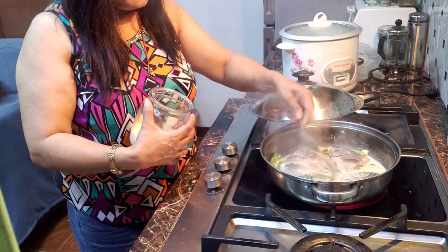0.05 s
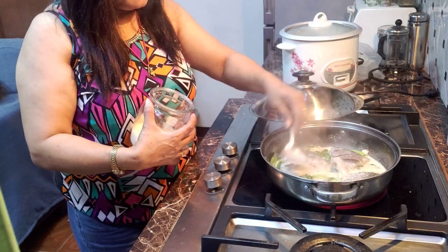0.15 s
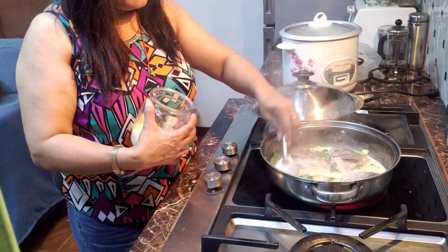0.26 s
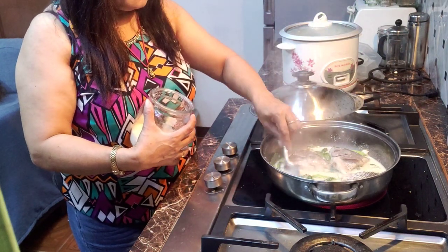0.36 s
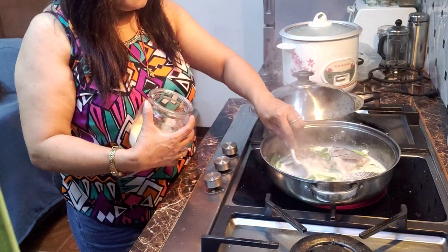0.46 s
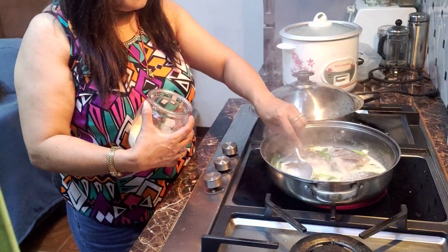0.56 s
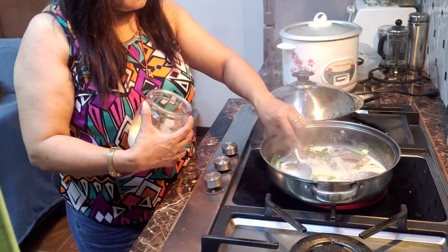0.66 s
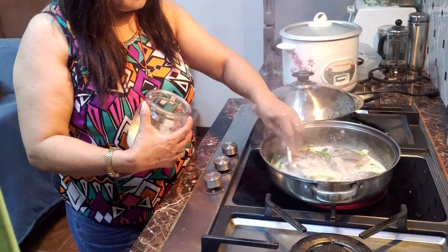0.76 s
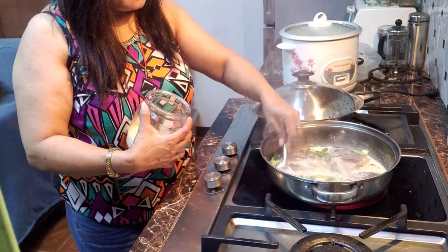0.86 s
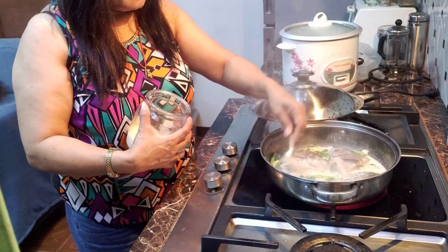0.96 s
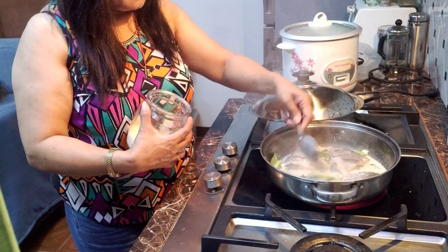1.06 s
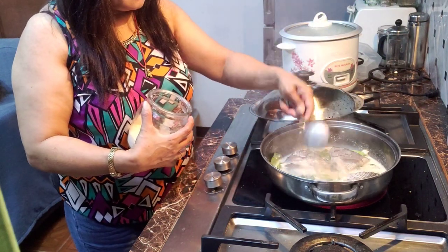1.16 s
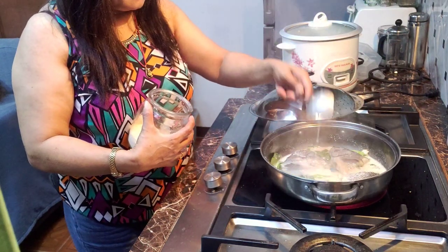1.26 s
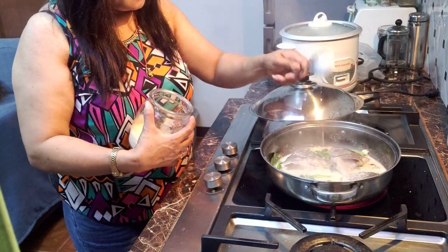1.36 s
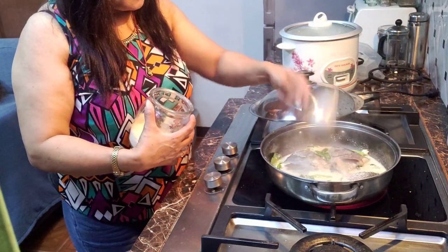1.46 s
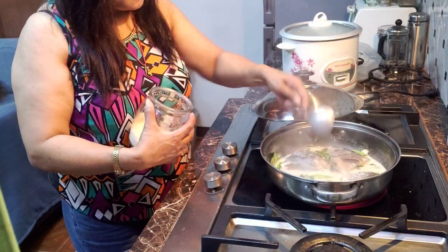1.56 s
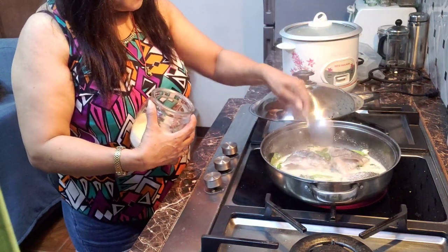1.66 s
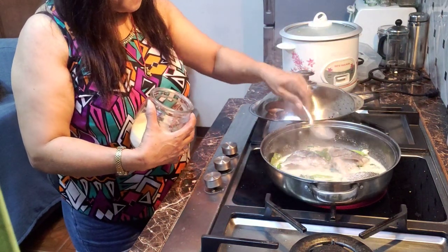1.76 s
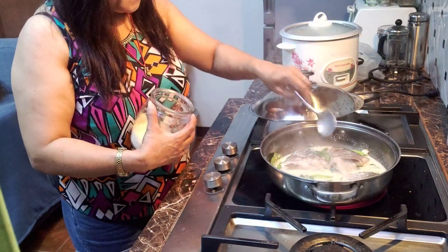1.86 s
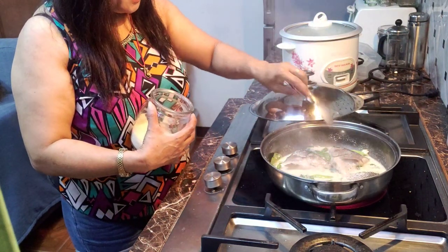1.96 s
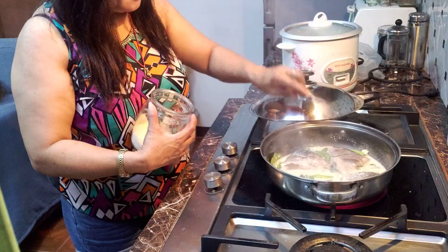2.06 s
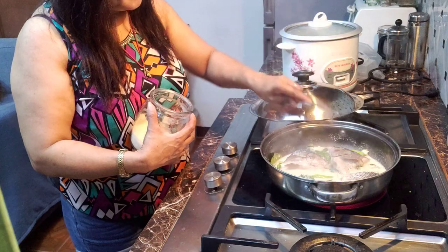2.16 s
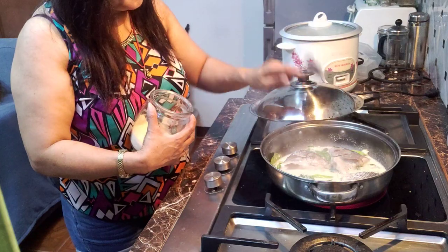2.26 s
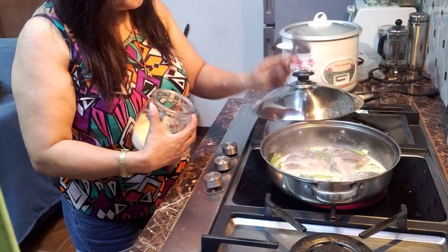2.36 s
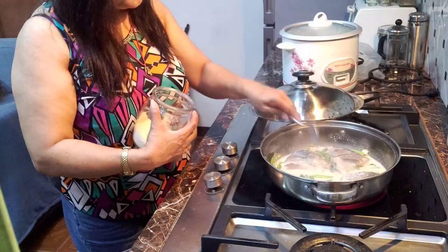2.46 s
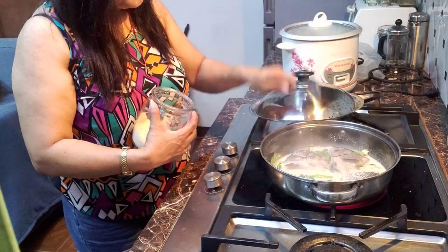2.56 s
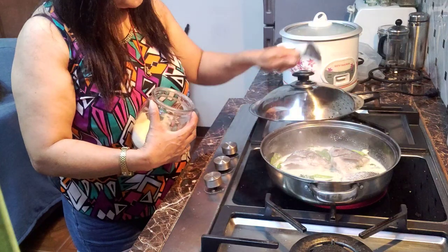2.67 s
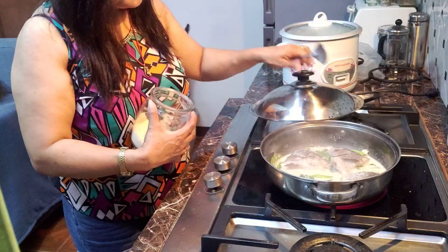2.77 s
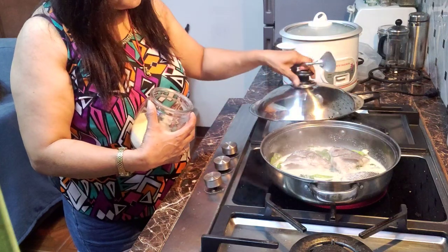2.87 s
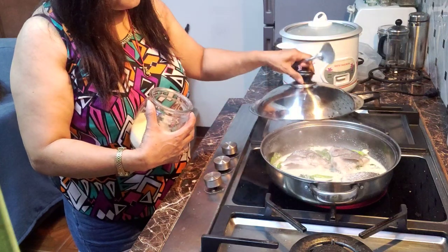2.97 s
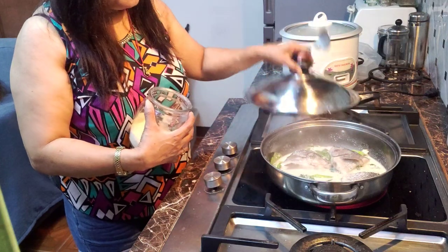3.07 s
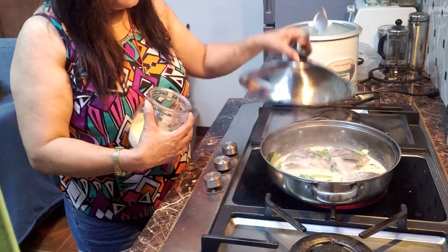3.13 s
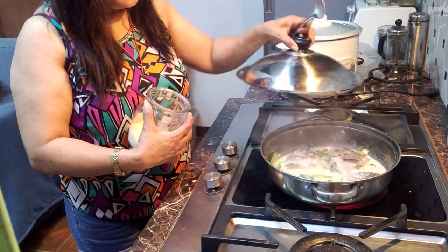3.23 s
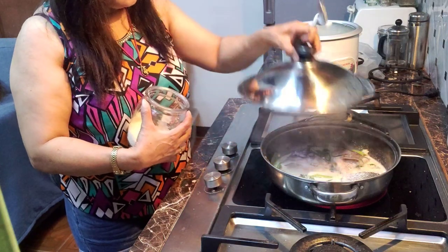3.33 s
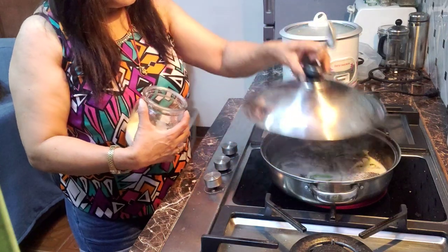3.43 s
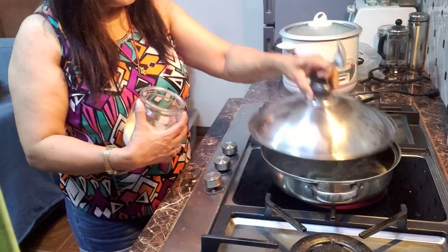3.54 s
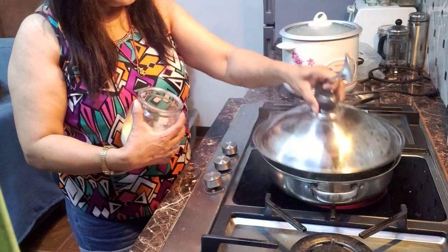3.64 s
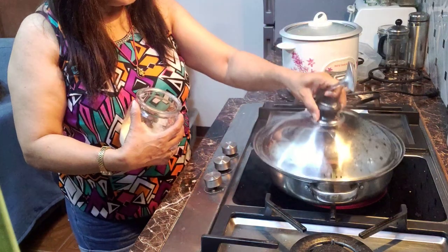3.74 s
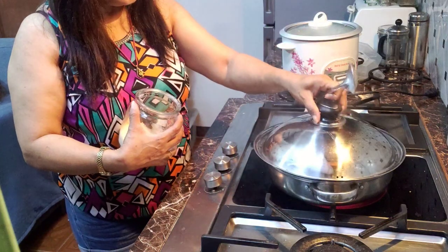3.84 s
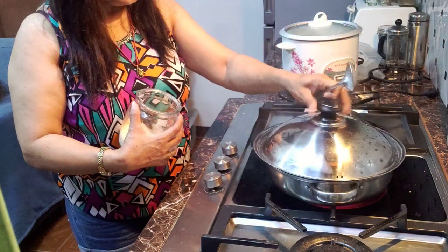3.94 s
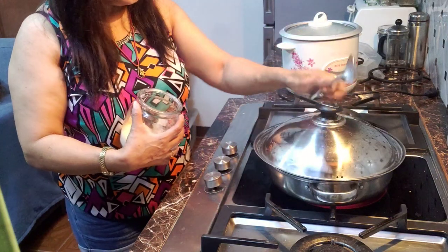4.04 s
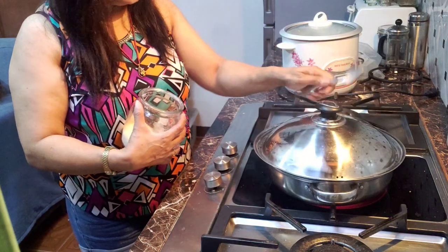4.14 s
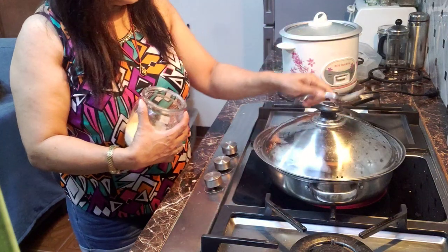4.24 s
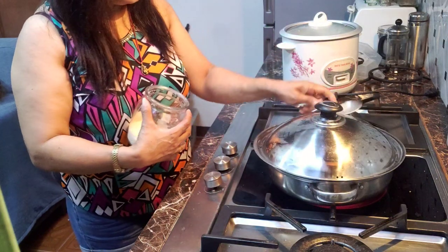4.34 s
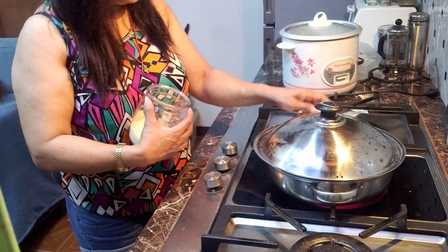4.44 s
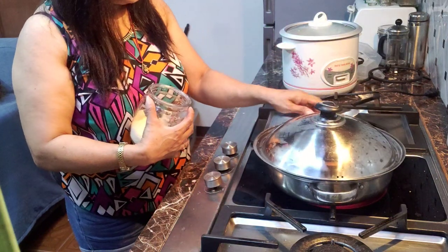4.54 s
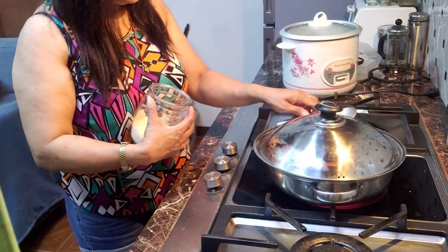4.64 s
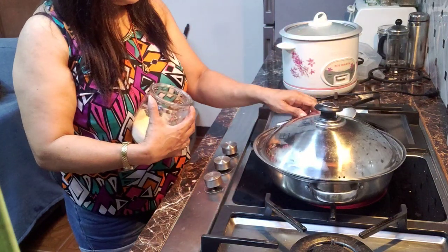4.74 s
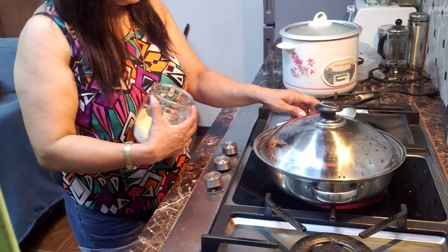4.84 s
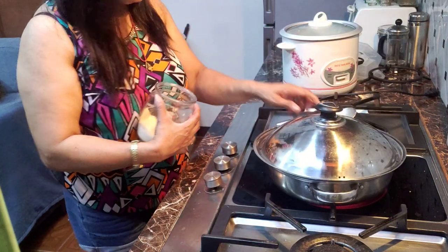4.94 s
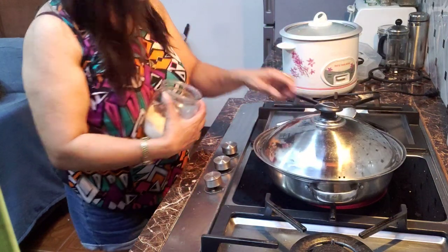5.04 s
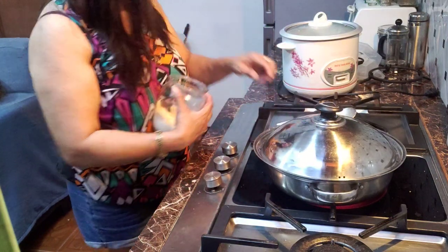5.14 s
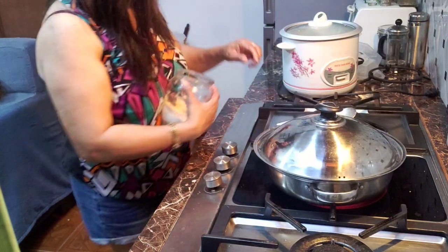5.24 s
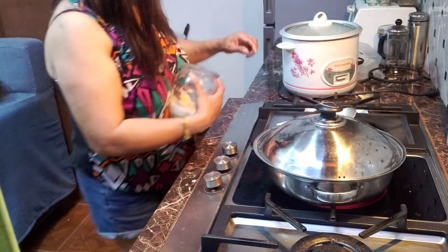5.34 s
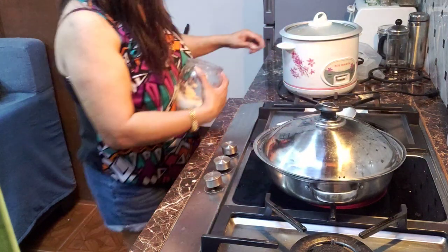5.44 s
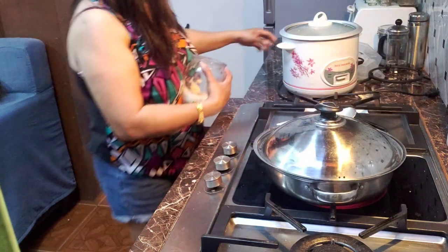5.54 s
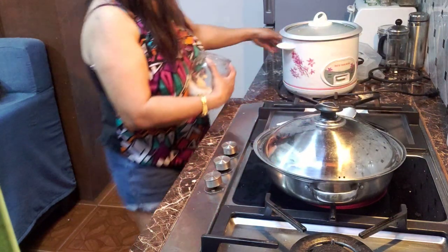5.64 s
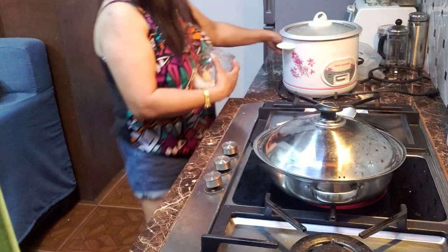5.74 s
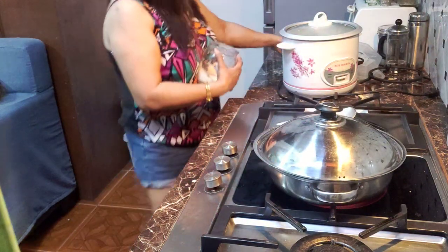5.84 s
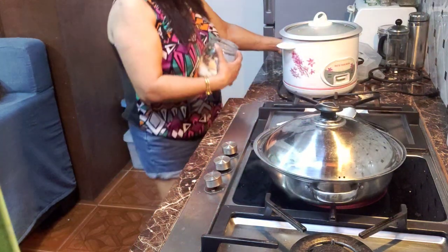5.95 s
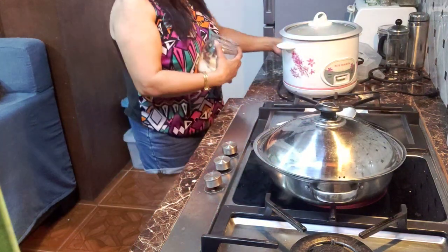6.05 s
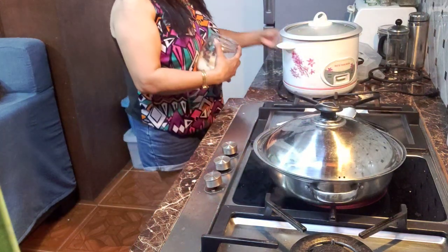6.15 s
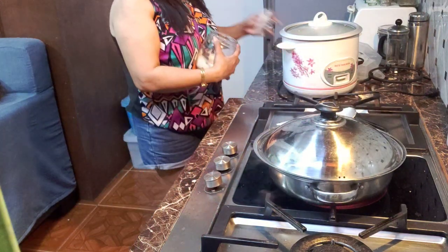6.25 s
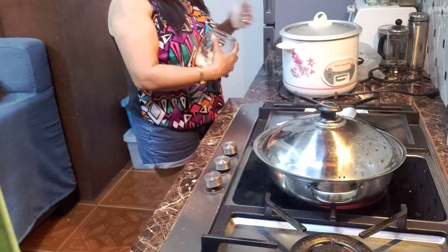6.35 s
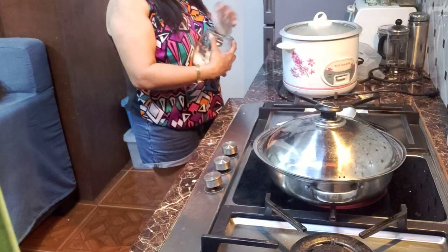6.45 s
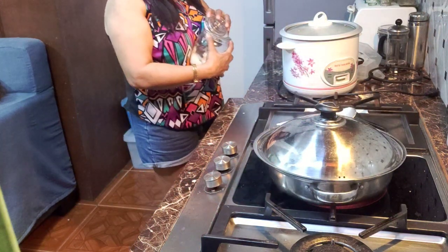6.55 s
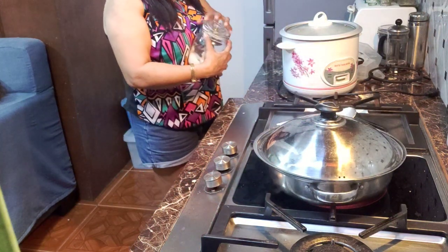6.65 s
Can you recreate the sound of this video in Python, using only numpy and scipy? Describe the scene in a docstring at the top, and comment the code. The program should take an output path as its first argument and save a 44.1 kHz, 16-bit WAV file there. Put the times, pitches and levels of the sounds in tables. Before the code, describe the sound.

A pan simmers quietly on a gas stove over a faint low rumble while a spoon taps lightly in it. A steel lid is picked up with a bright clink, then clanks loudly onto the pan, turning the bubbling into a dull drumming. The spoon clatters down on the stove top, and a few soft knocks follow. Heard close up in a small kitchen, slightly brighter on the left.

```python
"""A pan simmers on a gas stove in a small kitchen, over a wavering low rumble, while a spoon taps about.
A steel lid is lifted off the grate and clanks onto the pan, turning the bubbling into a dull drumming;
then the spoon is laid on the stove top. The simmer is noise shaped by resonances and swelling at random;
each impact excites damped modes, heard as a thud, a boom and a clatter.
Two close microphones pick it up, the left one brighter, through a noise suppressor."""
import sys
import numpy as np
from scipy import signal
from scipy.fft import irfft, next_fast_len
from scipy.io import wavfile

SR = 44100
rng = np.random.default_rng(int(sys.argv[2]) if len(sys.argv) > 2 else 0)


def int16_out(signal):
    """Quantize to a 16-bit WAV file."""
    q = np.round(np.clip(np.atleast_2d(signal).T, -1, 1) * 32767)
    wavfile.write(sys.argv[1], SR, q.astype(np.int16))


N = 295470
PADDED = next_fast_len(N)
TIME_S = np.arange(N) / SR
SIDES = np.array([[1], [-1]])   # left, right

def amp(db):
    """Amplitude ratio of a level in decibels."""
    return 10 ** (np.asarray(db) / 20)

def at_hz(points, hz):
    """Interpolation of a curve along a logarithmic frequency axis."""
    points_hz, values = np.transpose(points)
    return np.interp(np.log(hz), np.log(points_hz), values)

def drift(rate_hz):
    """Low-pass filtered noise: a slow random fluctuation of unit rms."""
    pole = np.exp(-80 * np.pi * rate_hz / SR)
    slow = signal.lfilter([1], [1, -2 * pole, pole * pole], rng.standard_normal(N // 40 + 2002))[2000:]
    slow /= np.sqrt(np.mean(slow ** 2) + 1e-20)
    return np.interp(np.arange(N) / 40, np.arange(len(slow)), slow)

# Likeness of the two microphone signals: frequency_hz, correlation (clipped to 0..1)
MIC_CORRELATION = [(60, 0.051), (160, 1), (430, 0.8996), (1130, -0.18), (3020, -1.4), (8030, 0.07)]
# Their level difference: frequency_hz, left_over_right_db
MIC_BALANCE = [(60, 11), (110, 4), (200, 5), (380, 5), (690, 5.5), (1280, -2), (2360, 5), (4350, 3),
               (8030, 9.5)]
def coloured(spectrum, low_hz=20, high_hz=9000, clusters=()):
    """Partial coherence: mid and side noise mix into a stereo band of given spectrum and unit mid rms."""
    low_hz, high_hz = max(low_hz, spectrum[0][0]), min(high_hz, spectrum[-1][0])
    bins = np.arange(int(low_hz * PADDED / SR), int(high_hz * PADDED / SR))
    hz = bins * SR / PADDED
    mid, side = rng.standard_normal((2, len(hz))) + 1j * rng.standard_normal((2, len(hz)))
    alike = np.clip(at_hz(MIC_CORRELATION, hz), 0, 1)
    noise = np.sqrt(1 + alike) * mid + np.sqrt(1 - alike) * side * SIDES
    peaks = sum(amp(2 * db) / (1 + (2 * (hz - top) / width) ** 2) ** 2 for top, width, db in clusters)
    level_db = at_hz(spectrum, hz) + SIDES * at_hz(MIC_BALANCE, hz) / 2
    pair = np.zeros((2, PADDED // 2 + 1), complex)
    pair[:, bins] = noise * amp(level_db) * np.sqrt(1 + peaks)
    out = irfft(pair, PADDED)[:, :N]
    return out / np.sqrt(np.mean(out.mean(axis=0) ** 2))

def fluctuating(spectrum, edges_hz, spread_db, rate_hz, shared_db=0, clusters=()):
    """Random amplitude modulation: each noise band swells alone, on top of any shared swell."""
    bands = list(zip(edges_hz, edges_hz[1:]))
    powers = [np.sum(amp(2 * at_hz(spectrum, np.linspace(a, b, 20)))) * (b - a) for a, b in bands]
    out = 0
    for power, band in zip(powers, bands):
        noise = np.sqrt(power / sum(powers)) * coloured(spectrum, *band, clusters)
        out += noise * amp(shared_db + spread_db * drift(rate_hz))
    return out

# Course of the simmer: time_s, bubbling_db, rumble_db
SIMMER_LEVELS = [(0.0, -70, -74.5), (0.3, -71, -81.5), (0.59, -67, -75), (0.85, -76.5, -81),
                 (1.12, -75, -72.5), (1.31, -69.5, -81.5), (1.75, -79.5, -79), (1.95, -71, -77),
                 (2.15, -67.5, -78), (2.41, -70.5, -75), (2.75, -77, -86), (3.0, -73, -77),
                 (3.55, -65.5, -81), (3.72, -58.5, -79.5), (4.45, -56, -70), (5.35, -58.5, -70.5),
                 (5.71, -56.5, -66), (6.05, -56.5, -63.5), (6.25, -62.5, -65), (6.46, -54.5, -64),
                 (6.7, -50, -59)]
LID_CLOSES_S = 3.2927, 3.7606
def simmer():
    """Superposition of bubbling, rumble and steam; the first two shift toward the centre under the lid."""
    time_s, *columns = np.transpose(SIMMER_LEVELS)
    bubbling_db, rumble_db = [np.interp(TIME_S, time_s, column) for column in columns]
    left_db = np.interp(TIME_S, LID_CLOSES_S, [8, 4])
    place = amp(left_db / 2 * SIDES)
    return bubbling(amp(bubbling_db) * place) + rumble(amp(rumble_db) * place) + steam()

# Spectra of the pan, open and under its lid: frequency_hz, density_db
OPEN_PAN_SPECTRUM = [(120, -49), (200, -41.5), (241, 6), (284, -22), (334, -1), (581, 0.5), (730, -5),
                     (939, -33), (1120, -45), (1400, -55), (1820, -76), (3080, -120)]
COVERED_PAN_SPECTRUM = [(110, -44), (180, -21.5), (247, -0.5), (351, -5), (395, -0.5), (565, -25.5),
                        (611, -34), (694, -42.5), (923, -39), (1200, -71.5), (1560, -98.5), (2640, -120)]
def bubbling(envelope):
    """Forced vibration: clumps of bursting bubbles, and blows, drive the pan; the lid dulls its sound."""
    bursts_db = 4.0 * drift(22)
    opened = fluctuating(OPEN_PAN_SPECTRUM, [221, 307.19, 441, 584.88, 743.48, 1449.7],
                         spread_db=2.5, rate_hz=8.3, shared_db=bursts_db)
    closed = fluctuating(COVERED_PAN_SPECTRUM, [183.14, 304.33, 384.29, 439.71, 595.45, 1111.1],
                         spread_db=3.0, rate_hz=12, shared_db=0.15 * bursts_db)
    covered = np.interp(TIME_S, LID_CLOSES_S, [0, 1])
    after_blows = lingering(contacts()["blow_db"] - 36.5, t60_s=1.0264)
    return np.hypot(envelope, after_blows) * ((1 - covered) * opened + covered * closed)

# Low noise of the stove: frequency_hz, density_db
RUMBLE_SPECTRUM = [(15, -54), (25, -19.5), (43, -24), (112, -0.5), (133, -1), (178, -5.5), (220, -11.5),
                   (290, -38), (480, -120)]
def rumble(envelope):
    """Low-frequency vibration: the stove wavers throughout and rumbles on after each thud."""
    wavering = fluctuating(RUMBLE_SPECTRUM, [25, 80, 130, 220], spread_db=5.0, rate_hz=5)
    after_thuds = lingering(contacts()["thud_db"] - 18, t60_s=0.8)
    return envelope * wavering + after_thuds * coloured(RUMBLE_SPECTRUM)

# Hiss of the steam: frequency_hz, density_db
STEAM_SPECTRUM = [(590, -31), (1000, -2.5), (1390, -13), (2350, -8), (3980, -12), (6720, -3.5), (7480, -4),
                  (8400, -23.5), (10900, -49), (18500, -120)]
# Faint thin flickering tones in the hiss: centre_hz, width_hz, boost_db
HISS_TONES = [(1862.9, 100, 9), (2341, 55, 14), (4510, 62, 5), (6682.7, 250, 5), (7560, 50, 6)]
def steam():
    """Broadband noise: steam hisses softly. Faint thin flickering tones are heard in the hiss."""
    return amp(-89) * fluctuating(STEAM_SPECTRUM, [1000, 2150, 3500, 5500, 7200, 8400],
                                  spread_db=3.0, rate_hz=6.5, clusters=HISS_TONES)

# Impacts of steel on steel: start_s, blow_db, pitch_hz, boom_db, clank_db, ring_db, tail_t60_s
IMPACTS = [(0.014, -42.5, 441, -63, -73, -66, 0.184), (0.158, -41, 700, -55, -64, -66.5, 0.14283),
           (0.291, -57, 581, -76.5, -64, -77, 0.1406), (0.367, -46.5, 700, -80, -75, -82, 0.29),
           (0.445, -34.5, 700, -62.5, -43, -49.5, 0.31607), (0.454, -28.5, 404, -43, -39.5, -62, 0.4329),
           (0.598, -49.5, 573, -74.5, -53.5, -84, 0.2009), (0.679, -62, 436, -60.5, -56.5, -99, 0.1457),
           (0.921, -52.5, 441, -64.5, -56, -84, 0.4044), (1.107, -40.5, 433, -44, -64.5, -62, 0.2362),
           (1.259, -57.5, 511, -80.5, -63, -87.5, 0.177), (1.295, -55.5, 248, -66.5, -71, -75.5, 0.7753),
           (1.935, -40, 347, -43.5, -60, -98.5, 0.3248), (2.349, -49.5, 581, -68.5, -77, -84.5, 1),
           (2.877, -50.5, 587, -79, -62, -103.5, 0.1637), (2.985, -35, 452, -33.5, -50, -36, 0.5848),
           (3.03, -29.5, 576, -29.5, -41, -49.5, 0.6289), (3.051, -25.5, 474, -28, -38.5, -24, 0.13647),
           (3.101, -19.5, 272, -23, -37.5, -31, 0.2592), (3.169, -35.5, 275, -31, -71.5, -47.5, 0.3751),
           (3.21, -41.5, 428, -46, -44.5, -50, 0.1692), (3.236, -26, 428, -37.5, -56.5, -55, 0.7672),
           (3.411, -49.5, 369, -60.5, -61, -66.5, 0.2897), (3.51, -64.5, 393, -63.5, -61.5, -73.5, 0.8228),
           (3.882, -5, 417, -15, -49, -47.5, 0.6636), (3.913, -0.017, 420, -11, -30, -27, 0.28381),
           (3.934, -8.5, 266, -28.5, -32.5, -40.5, 0.4099), (4.043, -35, 366, -31.5, -48, -44.5, 0.3966),
           (4.073, -22, 245, -35.5, -61, -66.5, 0.5576), (4.197, -29.5, 250, -25.5, -79.5, -66.5, 0.1703),
           (4.544, -20, 320, -10, -41.5, -39, 0.93), (4.596, -10.5, 314, -1.5, -26.5, -23, 0.19628),
           (4.615, -5.5, 380, -20.5, -31, -33.5, 0.3453), (4.719, -21, 385, -6, -31, -24, 0.28526),
           (4.741, -4.4279, 385, -17, -29.5, -37, 0.37383), (4.773, -24, 374, -28, -40.5, -47, 0.6202),
           (5.562, -45.5, 305, -35, -87.5, -102, 0.759), (6.009, -41, 248, -62.5, -80, -77.5, 0.19),
           (6.074, -53, 320, -42.5, -59, -67.5, 0.2567), (6.107, -46.5, 479, -37, -49.5, -116.5, 0.2784),
           (6.127, -30.5, 234, -38.5, -73.5, -69, 0.3277), (6.19, -55, 386, -45.5, -79, -71.5, 0.988),
           (6.311, -50, 388, -61, -95.5, -63.5, 0.2042), (6.368, -53.5, 285, -68.5, -100, -58, 0.1735),
           (6.597, -43, 318, -41.5, -67, -100, .28), (6.651, -20, 460, -27.5, -60, -56.5, 0.2428)]
# Response of spoon, lid, stove top, counter: thud_offset_db, clink_offset_db, blow_t60_s, left_db
OBJECT_RESPONSES = [(-15, 0, 0.05031, -1), (-10, -0.5, 0.04635, -1.0084), (-26.5, -4.5, 0.052986, -2),
                    (-19, -7.5, 0.06688, -0.8271)]
HANDLED_S = 0, 2.95, 3.7, 5.2, 7   # the four objects sound in turn between these times
THUD_DB_PER_OCTAVE, THUD_REFERENCE_HZ = -16.5, 281.84
def contacts():
    """Transmission of each impact: it depends on the object, and higher blows reach the grate less."""
    start_s, blow_db, pitch_hz, boom_db, clank_db, ring_db, tail_t60_s = np.transpose(IMPACTS)
    touched = np.searchsorted(HANDLED_S, start_s) - 1
    thud_offset_db, clink_offset_db, blow_t60_s, left_db = np.array(OBJECT_RESPONSES)[touched].T
    thud_db = blow_db + thud_offset_db + THUD_DB_PER_OCTAVE * np.log2(pitch_hz / THUD_REFERENCE_HZ)
    clink_db = clink_offset_db + (clank_db + ring_db) / 2
    return dict(start_s=start_s, touched=touched, pitch_hz=pitch_hz, left_db=left_db,
                blow_db=blow_db, thud_db=thud_db, boom_db=boom_db, clank_db=clank_db, clink_db=clink_db,
                ring_db=ring_db, blow_t60_s=blow_t60_s, tail_t60_s=tail_t60_s)

def knocks():
    """Impact sound: low modes of grate and pan, with treble placed where each blow falls."""
    hits = contacts()
    low = grate_thud(hits) + pan_body(hits) + pan_boom(hits)
    left_db = np.interp(TIME_S, hits["start_s"], hits["left_db"])
    return low + (clatter(hits) + edge_clicks(hits)) * amp(left_db / 2 * SIDES)

def impulses(heights):
    """Impulsive excitation: one sample at the start of each impact."""
    out = np.zeros(N)
    out[(np.array(IMPACTS)[:, 0] * SR).astype(int)] = heights
    return out + 1e-18

def lingering(level_db, t60_s, swell_s=0.06):
    """Energy storage: an envelope that builds after each impact and dies slowly; powers add."""
    fall, rise = amp(-120 / (t60_s * SR)), np.exp(-1 / (swell_s * SR))
    poles = np.convolve([1, -fall], [1, -rise])
    return np.sqrt(signal.lfilter([1 - rise], poles, impulses(amp(2 * level_db))))

def struck(modes, hits, level_db, spread_db, longest_s, reach_octaves=np.inf):
    """Modal synthesis: impacts ring damped sines, 12 dB weaker one reach away from the blow's pitch."""
    chance_db = spread_db * rng.standard_normal((len(IMPACTS), len(modes)))
    out = np.zeros(N)
    for k, (hz, mode_db, t60_s) in enumerate(modes):
        away_db = -12 * np.abs(np.log2(hz / hits["pitch_hz"])) / reach_octaves
        force = impulses(amp(level_db + mode_db + away_db + chance_db[:, k]))
        radius, angle = amp(-60 / (min(t60_s, longest_s) * SR)), 2 * np.pi * hz / SR
        out += signal.lfilter([0, np.sin(angle)], [1, -2 * radius * np.cos(angle), radius ** 2], force)
    return out

# Modes of the cast grate: pitch_hz, level_db, t60_s (capped at longest_s)
GRATE_MODES = [(96.147, -3, .45), (157.82, -5, .8)]
def grate_thud(hits):
    """Free vibration of the heavy grate in its low modes."""
    modes = struck(GRATE_MODES, hits, hits["thud_db"] - 7.5, spread_db=2.5, longest_s=0.73)
    band = signal.butter(2, [75, 200], "band", fs=SR, output="sos")
    return signal.sosfilt(band, modes) * amp([[1.7], [-1.9]])

# Modes of pan and stove top: pitch_hz, level_db, t60_s (capped at longest_s)
PAN_MODES = [(251.38, -11.5, .3), (320, -9, 0.19), (380, -6.5, .18), (413.59, -14.5, 0.24), (452, -7, 0.57),
             (572.83, -19, .2), (614, -23.5, .3)]
def pan_body(hits):
    """Selective excitation: each blow thumps and rings mostly the modes near its own pitch."""
    modes = struck(PAN_MODES, hits, hits["boom_db"] - 4, spread_db=6.5, longest_s=0.21, reach_octaves=0.4)
    band = signal.butter(3, [190, 750], "band", fs=SR, output="sos")
    return signal.sosfilt(band, modes + thumps(hits)) * amp([[1.7], [-1.9]])

def thumps(hits):
    """Heavy damping: the hand or the rim stops each blow within a few cycles."""
    out = np.zeros(N)
    for start_s, db, hz, t60_s in zip(hits["start_s"], hits["blow_db"], hits["pitch_hz"],
                                      hits["blow_t60_s"]):
        start = int(start_s * SR)
        t = TIME_S[:min(N - start, SR // 4)]
        envelope = amp(db - 60 * t / t60_s) * (1 - np.exp(-t / 0.0065))
        out[start:start + len(t)] += envelope * np.sin(2 * np.pi * hz * t)
    return out

def decay(hits, level_db, rise_s, crack_db, crack_s):
    """Incoherent addition: an envelope summing the power of each impact's short crack and longer tail."""
    coarse_s = np.arange(0, N + 16, 16) / SR
    age_s = np.maximum(coarse_s - hits["start_s"][:, None], 0)
    tail = amp(-120 * age_s / hits["tail_t60_s"][:, None])
    tail *= np.exp(-(age_s / 0.17) ** 2)   # late tails fade ever faster
    crack = amp(2 * crack_db) * np.exp(-age_s / crack_s)
    power = (tail + crack) * (1 - np.exp(-age_s / rise_s))
    return np.interp(TIME_S, coarse_s, np.sqrt(amp(2 * level_db) @ power))

def pan_boom(hits):
    """Resonant decay: each impact leaves a burst of noise with the covered pan's spectrum."""
    envelope = decay(hits, hits["boom_db"] - 14, rise_s=0.008, crack_db=-30.5, crack_s=0.004)
    return coloured(COVERED_PAN_SPECTRUM) * envelope

# Dense upper modes and their echo, in general and for the lifted lid: frequency_hz, density_db
CLATTER_SPECTRUM = [(310, -26), (520, -7), (746, -15.5), (942, -14.5), (1120, -22.5), (1960, -29.5),
                    (3050, -23), (4230, -22.5), (5150, -23), (6890, -21), (7740, -20.5), (8400, -45.5),
                    (10900, -78), (18500, -120)]
LID_SPECTRUM = [(310, -31), (520, -5), (577, -6), (953, -17), (1030, -14.5), (2590, -31), (4080, -14),
                (5270, -14), (6210, -7.5), (7830, -6.5), (8400, -33.5), (10900, -69), (18500, -120)]
# Mode clusters that stand out of each object's clatter: centre_hz, width_hz, boost_db
SPOON_CLUSTERS = [(1508.6, 38.49, 7), (1900, 115.06, 8), (2572.6, 36.9, 8.5), (3217.5, 122.4, 15),
                  (3657, 211.9, 7.5), (3879.6, 117.57, 7.5), (4664.8, 169.7, 16.5), (5366.5, 186.4, 15.5),
                  (6104.5, 165.67, 15), (7206.6, 113.9, 9.5), (7696.4, 200, 0.5)]
LID_CLUSTERS = [(1026, 13, 2.5), (1330, 14, 5.1), (1676.9, 60, 9.64), (1939.6, 100, 2.8),
                (3405.2, 74, 8.299), (3700.5, 80, 8.9), (4169.3, 46, 6.8), (4508.8, 54, 6.8),
                (5561.1, 40, 6.6), (6150, 76, 11), (6700, 36, 5.2), (6611, 45, 4), (7807.9, 140, 8.2)]
STOVE_TOP_CLUSTERS = [(594.1, 18, 11), (748.01, 27, 8.2), (942.9, 31, 8), (1353, 45, 9.5), (2300, 40, 5.6),
                      (2844.1, 33, 6.6), (3086.4, 220, 8), (3805, 60, 6), (4500, 61, 5.1),
                      (5213.3, 350, 8.6), (6045.6, 56, 7), (6960, 41, 7)]
COUNTER_CLUSTERS = [(900, 51, 4.8), (1735, 200, 10), (1909, 44, 19.21), (2450, 60, 12), (3880, 86, 11),
                    (5300.7, 80, 5.3), (6443.3, 590, 13), (6850, 78, 10.27), (7530, 100, 9.7)]
def clatter(hits):
    """Modal overlap: dense modes merge into noise, and each impact wakes some bands more than others."""
    edges_hz = np.array([520, 1150, 2200, 3000, 4300, 5700, 6500, 8400])
    centres_hz = np.sqrt(edges_hz[1:] * edges_hz[:-1])
    bandwidth_db = 10 * np.log10(np.diff(edges_hz) / 1000)
    chance_db = 2.0 * rng.standard_normal((len(IMPACTS), len(centres_hz))).T
    # band levels are interpolated between clank, clink and ring
    anchors_hz = [1300, 3500, 6300]
    anchors_db = np.array([hits["clank_db"] - 12.5, hits["clink_db"] - 14, hits["ring_db"] - 7.5])
    blend = np.array([np.interp(np.log(centres_hz), np.log(anchors_hz), row) for row in np.eye(3)]).T
    objects = [(SPOON_CLUSTERS, CLATTER_SPECTRUM), (LID_CLUSTERS, LID_SPECTRUM),
               (STOVE_TOP_CLUSTERS, CLATTER_SPECTRUM), (COUNTER_CLUSTERS, CLATTER_SPECTRUM)]
    out = 0
    for index, (clusters, spectrum) in enumerate(objects):
        level_db = blend @ (anchors_db - at_hz(spectrum, anchors_hz)[:, None]) + chance_db
        level_db += (at_hz(spectrum, centres_hz) + bandwidth_db)[:, None]
        level_db[:, hits["touched"] != index] = -300   # silent unless touched
        for low_hz, high_hz, band_db in zip(edges_hz, edges_hz[1:], level_db):
            envelope = decay(hits, band_db, rise_s=0.003, crack_db=-3.5, crack_s=0.0018)
            out += coloured(spectrum, low_hz, high_hz, clusters) * envelope
    return out

def edge_clicks(hits):
    """Contact transient: hard edges meet in one bare click, coherent in both microphones."""
    highpass = signal.butter(2, 1500, "high", fs=SR, output="sos")
    return signal.sosfilt(highpass, impulses(amp(hits["ring_db"] + 2))) * amp([[2.5], [-2.5]])

# Faint short narrow-band ticks and pings: start_s, pitch_hz, level_db, width_hz
FAINT_PINGS = [(.145, 652.8, -58.5, 198.2), (.217, 1985, -71, 404), (.33, 4500, -76, 300),
               (.68, 1085, -71.5, 99.85), (1.0, 2390, -81, 100.2), (1.271, 1800, -75.5, 399.4),
               (1.44, 1097, -80.5, 100.5), (1.472, 2900, -73.5, 798.7), (1.68, 1700, -79.5, 700.1),
               (1.95, 2185, -71.5, 900), (2.14, 2300, -83.5, 500.1), (2.22, 1803, -76.5, 398.7),
               (2.59, 1144, -77, 198.6), (3.05, 6150, -31, 301.1), (3.25, 1359, -66.5, 30),
               (3.36, 1390, -75.5, 59.55), (3.41, 3966, -79.5, 197.3), (3.471, 6688, -70.5, 100.2),
               (3.59, 6700, -75.5, 60), (3.51, 2098, -72, 149.8), (3.53, 1097, -71, 101.1),
               (3.62, 4630, -84.5, 49.7), (4.41, 900, -74.5, 78.88), (5.377, 6850, -73.5, 150),
               (5.68, 929, -80.5, 100.3), (6.011, 2450, -84.5, 200), (6.311, 6308, -74.5, 303.8),
               (6.367, 6352, -63.5, 300), (6.43, 1900, -86, 80.56), (6.61, 2450, -82, 200)]
def pings():
    """Beating: ten close sines interfere as they fade, and wider clusters die sooner."""
    out = np.zeros(N + SR)
    for start_s, pitch_hz, level_db, width_hz in FAINT_PINGS:
        scatter, phase = rng.random((2, 10, 1))
        sines_hz = pitch_hz + width_hz * (scatter - 0.5)
        decay_s = 0.047 * (width_hz / 100) ** -0.45
        t = TIME_S[:int(3 * decay_s * SR)]
        envelope = (1 - np.exp(-t / 0.004)) * np.exp(-(t / decay_s) ** 1.4)
        cluster = np.sin(2 * np.pi * (sines_hz * t + phase)).sum(axis=0) / np.sqrt(10)
        start = int(start_s * SR)
        out[start:start + len(t)] += amp(level_db) * envelope * cluster
    return out[:N] * amp([[2.0], [-2.5]])

def suppressor(x, threshold_db=-102, deepest_db=-3, from_hz=1000):
    """Spectral gating: treble bins near or below the threshold are turned down, shortening tails."""
    frames = dict(fs=SR, nperseg=512, noverlap=384, scaling="psd")
    hz, _, bins = signal.stft(x, **frames)
    power = np.mean(np.abs(bins) ** 2, axis=0) * SR / 512
    smoothed = signal.lfilter([0.14], [1, -0.86], power, axis=1)
    recent = np.maximum(power / 2, smoothed)   # opens at once, closes slowly
    gain = np.clip(1 - amp(2 * threshold_db) / (recent + 1e-20), amp(deepest_db), 1)
    gain[hz < from_hz] = 1
    return signal.istft(bins * gain, **frames)[1][:, :N]

def scene():
    """Linear superposition of the simmer, the knocks and the faint pings."""
    return simmer() + knocks() + pings()

def record(dry):
    """Band limiting: after the suppressor and faint electronic noise, the top rolls off and is cut."""
    wet = suppressor(dry) + amp(-101) * rng.standard_normal(dry.shape)
    wet = signal.sosfilt(signal.butter(4, 7900, fs=SR, output="sos"), wet)
    return signal.sosfilt(signal.cheby2(12, 60, 8635, fs=SR, output="sos"), wet)

dry = scene()
out = record(dry)
int16_out(out)
```